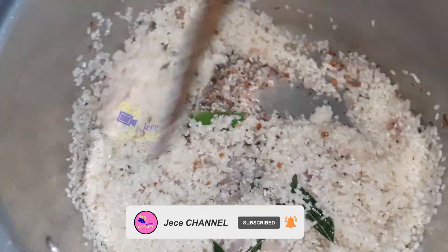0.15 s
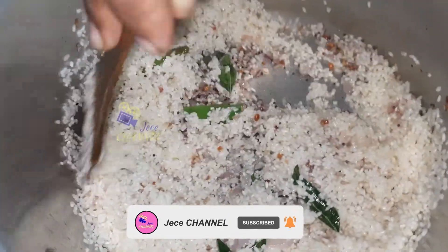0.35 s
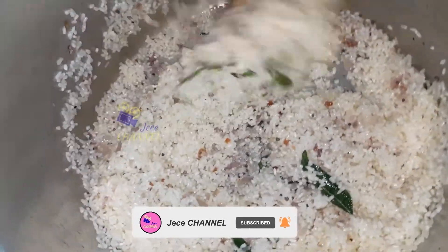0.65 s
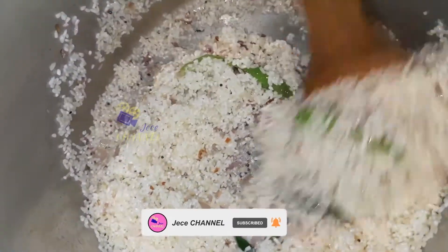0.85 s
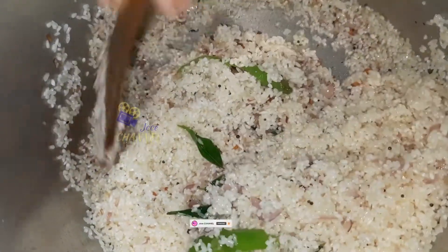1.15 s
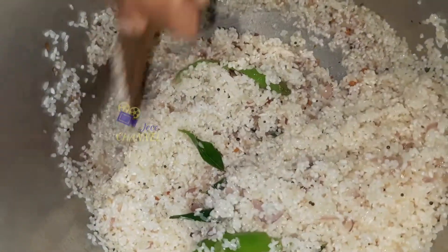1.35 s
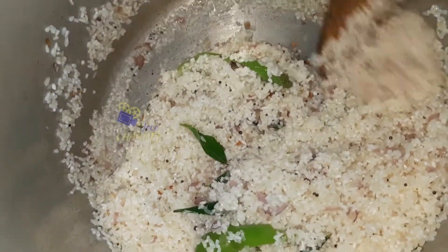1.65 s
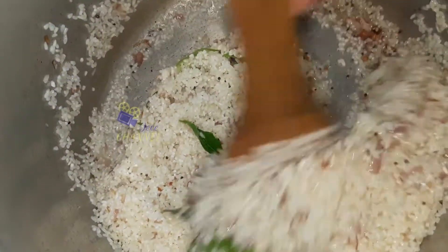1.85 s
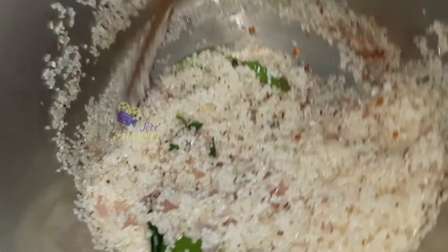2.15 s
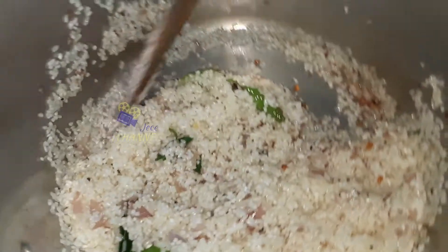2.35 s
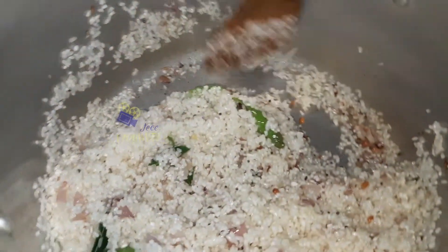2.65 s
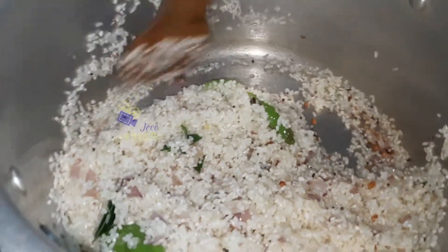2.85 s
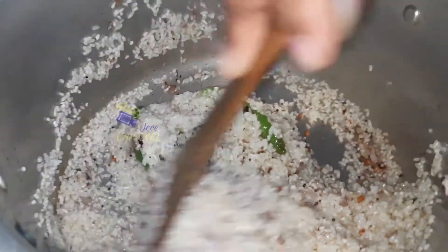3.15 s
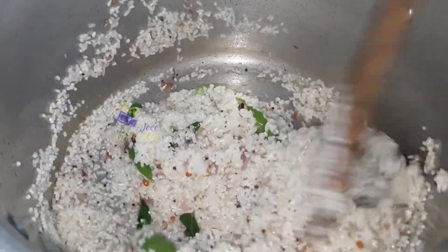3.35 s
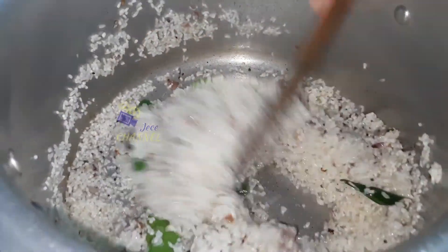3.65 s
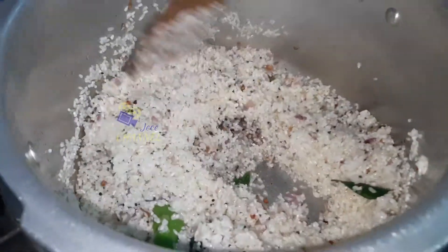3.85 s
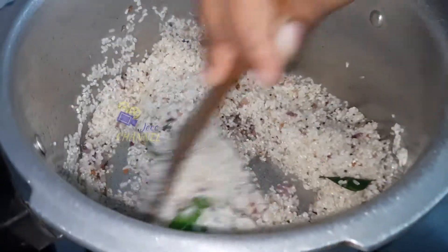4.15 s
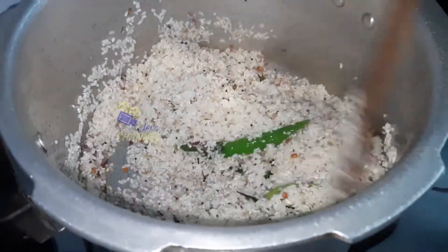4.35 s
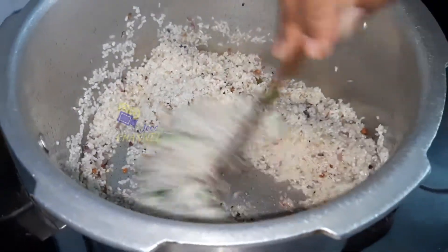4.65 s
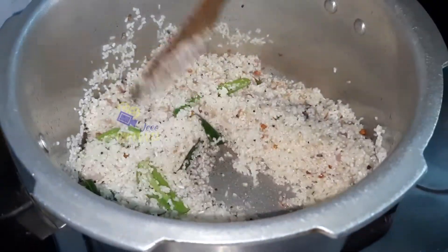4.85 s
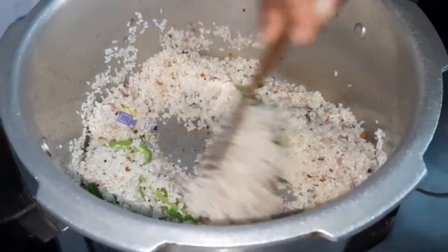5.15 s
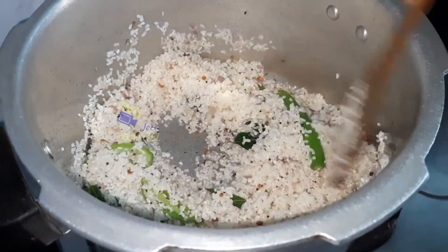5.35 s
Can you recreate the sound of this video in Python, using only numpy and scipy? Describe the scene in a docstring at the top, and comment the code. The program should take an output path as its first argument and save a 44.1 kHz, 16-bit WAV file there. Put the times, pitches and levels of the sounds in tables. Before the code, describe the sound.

Close, bright frying hiss of rice in oil, with woody knocks, short scrapes and hollow metallic clanks as someone stirs a pot.

```python
"""First heard are quick raps and a rub of a wooden spatula over the sizzle of raw rice in hot oil.
The sizzle is dense noise with moving spectral bands and surges; fat spits are short decaying noise bursts.
Sliding grains, rubs and knocks excite the resonances of wood and of a deep metal pot, damped by the rice.
The pot shudders on its grate as resonant hum and rattle; two faint frequency-swept tones glide past.
Beneath lies the low-passed murmur of burner and room. The sound is mono, heard close by."""
import sys
import numpy as np
from scipy import signal
from scipy.fft import rfft, irfft, next_fast_len
from scipy.io import wavfile
from scipy.ndimage import uniform_filter1d, map_coordinates

SR = 44100
rng = np.random.default_rng(int(sys.argv[2]) if len(sys.argv) > 2 else 0)


def unload_audio(sound):
    """Save the sound as a 16-bit wav file, at the path given as the first command line argument."""
    columns = np.transpose(np.atleast_2d(sound))
    # keep every value between -1 and 1, then stretch to whole-number steps
    steps = np.round(np.clip(columns, -1, 1) * 32767)
    wavfile.write(sys.argv[1], SR, steps.astype(np.int16))


N = 242461


def amp(db):
    """Level definition: decibels to amplitude gain."""
    return 10 ** (np.asarray(db) / 20)


def unit(x):
    """Normalisation to an rms of 1."""
    return x / np.sqrt(np.mean(x ** 2) + 1e-20)


def curves(rows):
    """Linear interpolation: one value per sample for each column after the time."""
    times, *columns = np.transpose(rows)
    return [np.interp(np.arange(N) / SR, times, column) for column in columns]


def wobble(rate):
    """Band-limited fluctuation: a smooth random curve with rate knots a second."""
    knots = rng.standard_normal(int(N * rate / SR) + 4)
    return map_coordinates(knots, [np.arange(N) * rate / SR])


def swell(peak_s, rise_s, fall_s):
    """Gaussian envelope: a bell of height 1 with separate widths before and after its peak."""
    t = np.arange(N) / SR - peak_s
    return np.exp(-.5 * (t / np.where(t < 0, rise_s, fall_s)) ** 2)


def filtered(x, response):
    """Linear filtering: the spectrum of x times a response of frequency, zero-padded against wrap-around."""
    size = next_fast_len(len(x) + 8192)
    spectrum = rfft(x, size) * response(np.fft.rfftfreq(size, 1 / SR))
    return irfft(spectrum, size)[:len(x)]


def colour(points):
    """Spectral shaping: gain through (f/Hz, level/dB) points on a log frequency axis."""
    hz, db = np.transpose(points)
    return lambda f: amp(np.interp(np.log(f + 1), np.log(hz), db))


def body(modes):
    """Modal superposition: causal resonances (f/Hz, width/Hz, level/dB), summed with alternating sign."""
    def response(f):
        total = 0
        for k, (centre, width, db) in enumerate(modes):
            damping = 1j * f * width
            total = total + (-1) ** k * amp(db) * damping / (centre * centre - f * f + damping)
        return total
    return response


def grit(lumpy_db, rate):
    """Impact noise: countless tiny impacts whose strength varies, with rate knots a second."""
    return unit(rng.standard_normal(N) * amp(lumpy_db * wobble(rate)))


# relative spectrum of the burner and room: [f/Hz, level/dB]
KITCHEN_SPECTRUM = [(13, -49), (22, -13), (80, -2), (195, 5), (304, -9), (370, -13), (439, 9.5), (500, 6.5),
                    (650, -12), (1100, -120)]
KITCHEN_DB = -61  # rms level


def kitchen():
    """Stationary noise: a shaped spectrum gives the low murmur of burner and room."""
    return amp(KITCHEN_DB) * unit(filtered(rng.standard_normal(N), colour(KITCHEN_SPECTRUM)))


# a low tone that sags as the pot settles and a thin rising whistle:
# [peak t/s, level/dB, rise t/s, fall t/s, f at the peak/Hz, glide/(octaves per s), waver/Hz]
GLIDING_TONES = [(4.88, -50, 0.035, .11, 138.5, -5.5, 7), (5.5, -46, 0.064, .05, 1450, 1.5, 33.7)]


def gliding_tones():
    """Frequency modulation: the phase integrates a gliding, wavering pitch under an unsteady swell."""
    out, t = np.zeros(N), np.arange(N) / SR
    for peak_s, db, rise_s, fall_s, hz, glide, waver_hz in GLIDING_TONES:
        octaves = np.clip(glide * (t - peak_s), -2, 2)
        pitch_hz = hz * 2 ** octaves + waver_hz * wobble(90)
        level = amp(db + 2.3 * wobble(70)) * swell(peak_s, rise_s, fall_s)
        out += np.sqrt(2) * level * np.sin(2 * np.pi * np.cumsum(pitch_hz) / SR)
    return out


# resonances of the pot's seat on the grate: [f/Hz, width/Hz, level/dB]
HUM_MODES = [(85, 22, 7), (154, 200, -9)]
RATTLE_MODES = [(249, 18.6, -5), (285.6, 11, 2.5), (311.4, 52, 2.5)]
# pushes that jolt the pot: [peak t/s, hum level/dB, rattle level/dB, rise t/s, fall t/s]
JOLTS = [(.01, -50, -32.5, .02, 0.05), (.085, -52, -27.5, .02, 0.059), (.41, -73, -52, 0.044, 0.024),
         (.64, -65, -56, 0.04, .06), (.95, -73, -45, .02, 0.072), (1.45, -63, -61, 0.11, 0.13),
         (1.83, -67, -42, 0.048, 0.097), (2.29, -60, -51.5, 0.022, 0.075), (2.97, -58, -46.5, 0.039, 0.041),
         (3.15, -60, -55, .04, 0.047), (3.734, -63, -31, 0.047, 0.068), (4.21, -64, -63, 0.066, 0.028),
         (4.628, -40, -32, 0.0099, 0.035), (4.70, -40, -37.5, 0.034, 0.062), (5.1, -69, -58, 0.025, .08)]
REST_HUM_DB, REST_RATTLE_DB = -70, -66.5  # between pushes


def shudder():
    """Forced vibration: pushes raise a low hum and a lumpier rattle of the pot's seat on the grate."""
    shapes = np.array([swell(peak_s, rise_s, fall_s) for peak_s, _, _, rise_s, fall_s in JOLTS])
    hum_db, rattle_db = np.transpose(JOLTS)[1:3]
    hum = unit(filtered(rng.standard_normal(N), body(HUM_MODES)))
    rattle = unit(filtered(grit(lumpy_db=3.5, rate=27), body(RATTLE_MODES)))
    hum_level = amp(REST_HUM_DB) + amp(hum_db) @ shapes
    rattle_level = amp(REST_RATTLE_DB) + amp(rattle_db) @ shapes
    return hum_level * hum + rattle_level * rattle


# modes of the metal pot: [f/Hz, level/dB, t60/s]
POT_MODES = [(585, -8, 0.035), (636, -5, 0.16), (689.6, -5.5, 0.084), (773, -11, 0.094), (837, -3.5, 0.34),
             (1108, -12, 0.028), (1186, -9.5, 0.038), (1425, -13, 0.038), (1670, -26.5, 0.021),
             (1927, -14.5, 0.019), (2460, -17, 0.025), (2650, -18.5, 0.11), (3050, -15.5, 0.02),
             (3908, -12, 0.13), (4440, -29, 0.014)]


def pot(f):
    """Modal damping: each decay time t60 sets a resonance width of ln(1000) / (pi t60)."""
    return body([(hz, np.log(1000) / (np.pi * t60), db) for hz, db, t60 in POT_MODES])(f)


# modes of the wooden spatula: [f/Hz, width/Hz, level/dB]
BLADE_MODES = [(865, 112, -1), (1930, 330, -16)]


def wood(f):
    """Radiation efficiency: a broad resonance weakens the blade's sound below and above its modes."""
    return body(BLADE_MODES)(f) * body([(1000, 1100, 0)])(f)


# level of rice sliding over the pot: [t/s, level/dB]
SLIDING_LEVEL = [(0.0, -25.5), (0.17, -36.5), (0.37, -43), (0.84, -38), (1.06, -45), (1.77, -39),
                 (1.97, -45), (3.06, -45), (3.25, -49), (3.54, -45.5), (3.78, -40), (4.3, -47),
                 (4.53, -48.5), (4.73, -42), (4.87, -48), (5.5, -48)]
# resonances of the pot under sliding rice: [f/Hz, width/Hz, level/dB]
HOLLOW_MODES = [(325, 110, -22), (458, 25, -1.5), (581, 160, 5), (1166, 127, 7), (1700, 210, -1),
                (2640, 50, -2)]
# strokes where the blade rubs the metal: [peak t/s, level/dB, rise t/s, fall t/s]
RUBS = [(.004, -21.5, 0.0045, .025), (.735, -39.5, 0.038, 0.055), (1.645, -32, 0.036, 0.03),
        (3.13, -45.5, 0.018, 0.063), (3.629, -26.5, .004, 0.056), (4.655, -29, 0.027, 0.011),
        (4.70, -32.5, 0.0085, 0.046), (5.145, -33, 0.031, 0.06)]


def stirring():
    """Friction excitation: grains sound the hollow pot, and the rubbing blade sounds wood and pot."""
    rice = unit(filtered(grit(lumpy_db=1.0, rate=90), lambda f: body(HOLLOW_MODES)(f) + pot(f)))
    blade = unit(filtered(grit(lumpy_db=2.0, rate=150), lambda f: wood(f) + 0.68 * pot(f)))
    pressure = sum(amp(db) * swell(peak_s, rise_s, fall_s) for peak_s, db, rise_s, fall_s in RUBS)
    sliding_db, = curves(SLIDING_LEVEL)
    return amp(sliding_db) * rice + pressure * blade


# the contact's short ring: [f/Hz, width/Hz, level/dB]
CLICK_MODES = [(1610, 440, -3), (2860, 400, -4), (4240, 680, -3)]


def contact_band(f):
    """Band limitation: a broad resonance and a second-order roll-off bound the contact's ring."""
    return body([(2500, 3000, 0)])(f) / (1 + 1j * f / 7500) ** 2


def lowest_ring(f):
    """Modal response: the lowest resonance of the contact."""
    return body(CLICK_MODES[:1])(f) * contact_band(f)


def upper_rings(f):
    """Modal response: the contact's resonances without the lowest."""
    return body(CLICK_MODES)(f) * contact_band(f) - lowest_ring(f)


# knocks of the spatula: [t/s, push on the pot level/dB, click's lowest ring level/dB,
# click's upper rings level/dB, wooden clack level/dB, chatter t60/s, contact hardness f/Hz]
KNOCKS = [(.0018, -11, -14, -28, 23, 0.11, 1000), (.014, -15, -20, -30, 16, .05, 1000),
          (.029, -18, -18, -25, 19, .05, 1000), (0.051, 10, 2, -1, 8.5, 0.3, 2000),
          (.3138, -8, -16, -22, -1, 0.24, 3000), (.9158, 6.5, -7.5, -7.5, 14.5, 0.27, 1190),
          (1.7488, -9, -17, -14, -4.5, 0.21, 2000), (1.7838, -6, -29.5, -29.5, 16.5, 0.17, 1000),
          (1.8163, 9.5, -4.5, -6, 5, 0.24, 1500), (2.2628, 1.5, -24, -28.5, -6.5, 0.14, 500),
          (2.5498, -14, -19, -22, 5.5, 0.28, 2000), (2.7428, -12, -41.5, -39, -11.5, 0.13, 600),
          (2.9418, -6.5, -40.5, -38, -9.5, 0.28, 700), (3.4718, -6, -23, -17, .6, 0.078, 2000),
          (3.6148, -15, -10.5, -27, 31.5, 0.14, 1000), (3.628, -19, -30, -35, 22, .05, 1000),
          (3.640, -14, -24, -35, 23, .05, 1000), (3.6538, -9, -14, -11.5, 14, 0.29, 3000),
          (3.6998, 10.5, 4, -2, 4.5, 0.29, 2010), (3.7608, -9, -16, -24, 19, 0.37, 1500),
          (3.9488, -32, -25, -26, -8.5, .1, 2000), (4.5938, -0.5, -3, -0.5, 14, 0.41, 3020),
          (4.6728, 4.5, -7, -13, 20, 0.28, 1460)]


def knocks():
    """Impulse excitation: a click, a wooden clack and a blow, then chatter of blade and rice drives the pot."""
    push, click, bright, clack = np.zeros((4, N + SR))
    t = np.arange(SR // 2) / SR
    for start_s, pot_db, click_db, bright_db, clack_db, t60, hard_hz in KNOCKS:
        at = round(start_s * SR)
        lumps = amp(2.06 * map_coordinates(rng.standard_normal(size=200), [t * 250]))
        build_up = 1 - np.exp(-t / 0.0011)
        fade = amp(-60 * (t / t60) ** 1.067) * build_up  # the rice smothers the chatter
        chatter = fade * lumps * rng.standard_normal(len(t))
        chatter *= np.linalg.norm(fade) / np.linalg.norm(chatter)  # the energy of the fade
        chatter[0] = amp(20.5)  # the blow itself
        keep = np.exp(-2 * np.pi * hard_hz / SR)  # a soft contact lacks treble
        push[at:][:len(t)] += amp(pot_db) * signal.lfilter([1 - keep], [1, -keep], chatter)
        crunch = amp(-60 * t / 0.078) * rng.standard_normal(len(t))
        crunch[0] = amp(22)  # the contact itself
        click[at:][:len(t)] += amp(click_db) * crunch
        bright[at:][:len(t)] += amp(bright_db) * crunch
        clack[at] -= amp(clack_db)
    ringing = filtered(push[:N], pot) + filtered(clack[:N], wood)
    return ringing + filtered(click[:N], lowest_ring) + filtered(bright[:N], upper_rings)


# fat spits: [t/s, initial noise level before the band-pass/dB]
SPITS = [(0.6261, -32), (0.6895, -34), (1.0412, -21), (1.3405, -36), (2.246, -21), (2.4056, -37),
         (3.3273, -22), (3.3909, -30), (3.5929, -24), (4.5941, -37), (4.643, -38), (4.7198, -21)]


def spits():
    """Transient noise: bigger drops burst in short bright puffs with exponential decay."""
    out, t = np.zeros(N + SR), np.arange(SR // 20) / SR
    for start_s, db in SPITS:
        puff = amp(db - 60 * t / 0.046) * rng.standard_normal(len(t))  # t60 of 46 ms
        out[round(start_s * SR):][:len(t)] += puff
    return filtered(out[:N], lambda f: 1 / (1 + (3000 / (f + 1)) ** 4) / (1 + (f / 11000) ** 4))


def patchy(x, depth_db, size, count):
    """Time-frequency modulation: random gain patches, count bins wide and ten frames long."""
    grid = signal.stft(x, nperseg=size)[2]
    across_bins = uniform_filter1d(rng.standard_normal(grid.shape), count, 0)
    field = uniform_filter1d(across_bins, 10, 1)
    return signal.istft(grid * amp(depth_db * unit(field)), nperseg=size)[1][:N]


# how hard the oil fries: [t/s, level/dB]
FRYING_LEVEL = [(0, -29.5), (.4, -29.5), (.57, -31.5), (.85, -29.5), (1.4, -30), (1.75, -29.5), (2.05, -32),
                (2.8, -34), (3.3, -35), (3.7, -32.5), (4.0, -32.5), (4.3, -33.5), (4.55, -34.5), (5.0, -36),
                (5.34, -35), (5.42, -37.5), (5.5, -36.5)]
# relative spectrum of the bursting bubbles: [f/Hz, level/dB]
SIZZLE_SPECTRUM = [(760, -32), (1300, -16.5), (1430, -23.5), (1910, -13.5), (2530, -14), (4120, -3.5),
                   (5390, -2), (5920, -0.5), (6440, -1.5), (7440, -0.5), (11900, -4), (13500, -7.5),
                   (15600, -16.5)]
# thin wall singing with the sizzle: [f/Hz, width/Hz, level/dB]
WALL_MODES = [(2394, 36, -2.5), (3430, 35, -46), (4000, 52, -17), (4880, 26, -16), (5328, 50, -22)]
# the brightest band wanders as the heap changes shape: [t/s, centre f/Hz, lift level/dB]
BRIGHT_BAND = [(0, 6700, 3), (.45, 6500, 4), (.75, 6950, 2.5), (1.05, 6340, 3), (1.35, 6150, 5),
               (1.65, 6260, 1.5), (2.1, 6700, 2.5), (3.2, 7000, 0), (3.9, 8000, 2), (4.3, 7340, 1.5),
               (4.6, 4460, -0.5), (5.5, 4600, 1.5)]
# the blade turns wet rice onto the hot floor: [peak t/s, lift level/dB, rise t/s, fall t/s]
SURGES = [(.06, -0.5, .04, .06), (.71, 4, 0.074, 0.077), (1.36, 1, 0.046, 0.056), (1.61, 3.5, 0.039, 0.046),
          (2.97, 1, 0.051, 0.22), (3.41, 2, 0.053, .04), (3.86, 2, 0.055, 0.16), (4.62, 2.5, 0.044, 0.17),
          (5.19, 2, .12, 0.092)]
# lower sizzle against the middle band: [t/s, level/dB]
LOWER_LEVEL = [(0, 0), (.2, -9), (.6, -6.5), (1.1, -13.5), (1.6, -10.5), (2.8, -9), (3.45, -9.5),
               (3.8, -6.5), (4.6, -7), (5.2, -5.5), (5.5, -8)]
TOP_DB, TOP_SURGES = -8, 0.28  # top band against the middle band; its share of a surge
DULLS = 0.44  # extra dB lost by the top band for each dB the frying dies down


def sizzle():
    """Dense superposition: bursts of steam bubbles in the oil merge into patchy noise that surges."""
    fry_db, = curves(FRYING_LEVEL)
    surge_db = sum(db * swell(peak_s, rise_s, fall_s) for peak_s, db, rise_s, fall_s in SURGES)
    top_db = TOP_DB + TOP_SURGES * surge_db + DULLS * (fry_db - fry_db.mean())
    low_db = curves(LOWER_LEVEL)[0] + surge_db

    bursts = grit(lumpy_db=0.8, rate=760)
    bursts = patchy(bursts, depth_db=0.4, size=256, count=8)  # broad patches
    bursts = patchy(bursts, depth_db=1.4, size=1024, count=4)  # narrow vents whistle faintly
    hiss = filtered(bursts, lambda f: colour(SIZZLE_SPECTRUM)(f) * (1 + np.abs(body(WALL_MODES)(f))))

    top = filtered(hiss, lambda f: 1 / (1 + (9500 / (f + 1)) ** 8))
    low = filtered(hiss, lambda f: 1 / (1 + (f / 3600) ** 8))
    hz, t, grid = signal.stft(hiss - top - low, SR, nperseg=512)
    centre_hz, lift_db = (np.interp(t * SR, np.arange(N), curve) for curve in curves(BRIGHT_BAND))
    bell = np.exp(-((hz[:, None] - centre_hz) / 700) ** 2)
    mid = signal.istft(grid * amp(lift_db * bell), SR, nperseg=512)[1][:N]

    bands = amp(surge_db) * unit(mid) + amp(top_db) * unit(top) + amp(low_db) * unit(low)
    return amp(fry_db + 0.53 * wobble(30)) * bands


def scene():
    """Linear superposition: all sources add at one microphone, which feeds both channels."""
    mono = kitchen() + gliding_tones() + shudder() + stirring() + knocks() + spits() + sizzle()
    return np.array([mono, mono])


TOP_HZ = 15720  # band limit


def record(dry):
    """Ideal low-pass filtering: nothing remains at or above the band limit."""
    return np.array([filtered(channel, lambda f: f < TOP_HZ) for channel in dry])


dry = scene()
out = record(dry)
unload_audio(out)
```